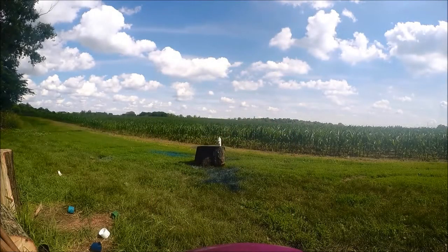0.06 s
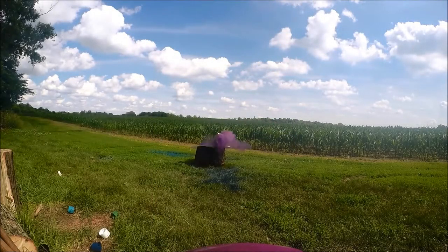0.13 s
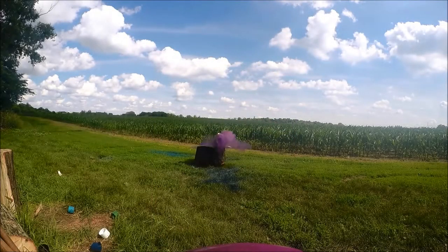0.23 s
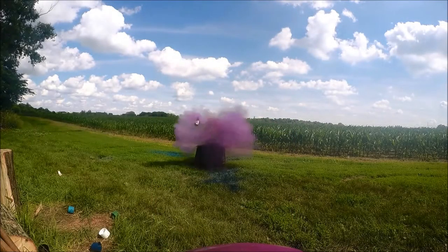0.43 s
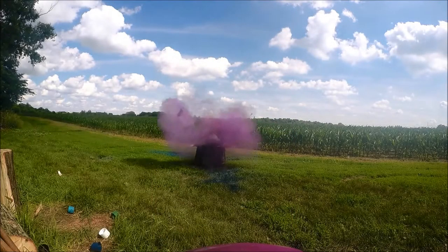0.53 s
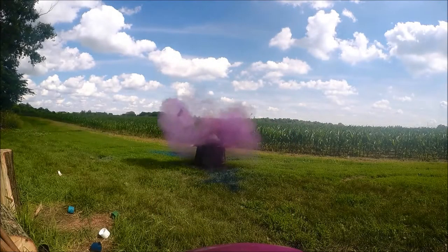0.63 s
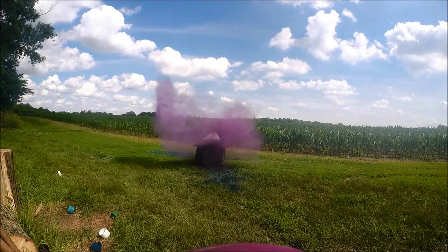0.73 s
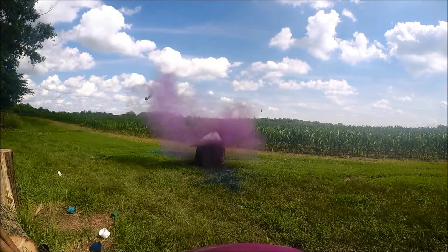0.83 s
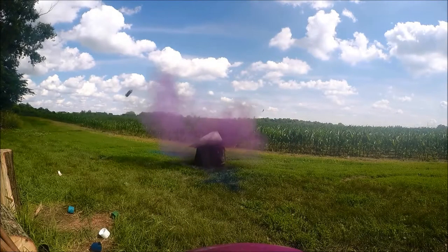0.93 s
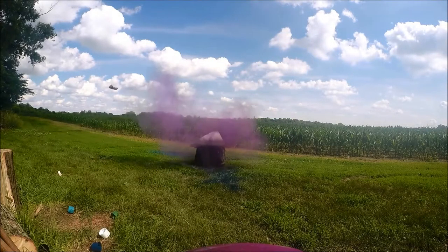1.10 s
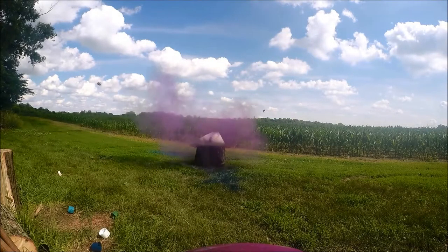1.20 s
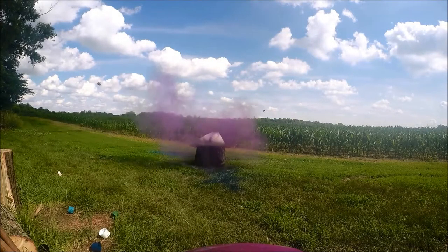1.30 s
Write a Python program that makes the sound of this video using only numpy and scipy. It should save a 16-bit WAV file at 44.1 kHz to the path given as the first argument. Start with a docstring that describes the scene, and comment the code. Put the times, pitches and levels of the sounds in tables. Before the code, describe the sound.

One sharp, close rifle shot overloads a muffled microphone outdoors. Right after it, a spray can tears open with a pop and a brief sputtering hiss. The shot echoes off crops and trees, dulling away above a faint wind rumble.

```python
"""Light wind rumbles on a microphone in an open field. A rifle cracks close by, overloading the
narrow-band microphone, and its blast sets the shooting stand ringing over a short, low boom.
Down range a spray can tears, pops and hisses out in surges. The report rolls back from crops
and trees, dulling as it fades, with one distinct far echo."""
import sys
import numpy as np
from scipy.fft import rfft, irfft, next_fast_len
from scipy.io import wavfile
from scipy.ndimage import map_coordinates

SR = 44100
rng = np.random.default_rng(int(sys.argv[2]) if len(sys.argv) > 2 else 0)


def persist_wave(psi):
    """Save psi, clipped to +-1, as 16-bit WAV."""
    counts = np.round(np.clip(psi, -1, 1) * 32767).astype(np.int16)
    wavfile.write(sys.argv[1], SR, np.atleast_2d(counts).T)


N = 59535

# swell of the wind and low rumble: time_s, level_db
RUMBLE_LEVEL = [(0, -55.5), (.19, -51.5), (.24, -37), (.3, -36), (.35, -29), (.41, -34), (.7, -40.5),
                (1.0, -43.5), (1.35, -42)]
# tone of the rumble and of the open air: freq_hz, level_db
RUMBLE_COLOUR = [(4, -6.5), (11, -8.5), (25, -3), (40, -19), (70, -25.5), (130, -29.5), (300, -66),
                 (900, -82)]
AIR_COLOUR = [(40, -8), (120, -7.5), (250, -2), (330, -9), (520, -12.5), (900, -12), (2000, -19),
              (3800, -23)]
# the bullet's snap, then the muzzle blast: start_s, level_db, t60_s
RIFLE_CRACKS = [(0.2080, -3, 0.0027), (0.2098, -1.5, 0.069)]
# tone of those cracks and of the boom around the stand: freq_hz, level_db
CRACK_COLOUR = [(40, -33), (100, -4.5), (190, -2.5), (260, 3.5), (500, -4), (800, 1), (1250, 1),
                (1500, -21.5), (2500, -11.5), (3800, -27.5)]
BOOM_COLOUR = [(60, -11.5), (150, -17), (200, -17), (250, 1.5), (300, -9.5), (350, -1), (480, -10),
               (650, -8), (1200, -12.5), (1600, -28), (3800, -35)]
# ringing modes of the stand: pitch_hz, level_db, t60_s, rise_s
STAND_MODES = [(80.4, -11, 0.062, 0.00081), (259.5, 5.5, 0.092, 0.015), (331, 1, 0.055, 0.013),
               (443.6, -9, .07, .008), (636, -5.5, 0.092, 0.0051), (810.7, 6.5, 0.055, 0.00042),
               (1055, -1.5, 0.063, 0.0042), (1217, -3.5, 0.051, 0.0053), (1306, -1, 0.065, 0.0028),
               (1618, -17.5, .08, .003), (1904, -17.5, .075, 0.00051), (2386, -6, 0.037, 0.0007),
               (2793, -15.5, 0.042, 0.0008), (3440, -17.5, .055, 0.0014)]
# fade of the rolling report: time_s, level_db
ROLL_LEVEL = [(.215, -12), (.262, -29.5), (.29, -24.5), (.315, -34), (.36, -24), (.43, -28.5), (.5, -29.5),
              (.555, -36), (.66, -33), (.715, -37.5), (.755, -42), (.84, -41), (.9, -38), (.945, -43.5),
              (.98, -42), (1.06, -45.5), (1.2, -51.5), (1.35, -54)]
# tone of the near and the far reflections: freq_hz, level_db
NEAR_COLOUR = [(60, -23.5), (110, -25.5), (190, -14.5), (245, 1.5), (290, -12.5), (335, 2), (520, -11),
               (630, 4.5), (690, 2), (760, 5), (900, 6.5), (1150, -6), (1310, -7), (1450, -18.5),
               (1650, -14), (2800, -23.5), (3800, -30.5)]
FAR_COLOUR = [(60, -18), (110, -19.5), (190, -11.5), (245, -2.5), (290, -5), (400, -2), (520, -7),
              (620, 4.5), (690, -1.5), (820, 2.5), (1100, -9.5), (1600, -15), (2800, -23.5), (3800, -30)]
# cracks as the bullet strikes and the can tears: start_s, level_db, t60_s
CAN_TEARS = [(0.2562, -23.5, 0.036), (0.2705, -17.5, 0.044), (0.273, -11, 0.018), (0.2825, -24, 0.043)]
# tone of the tearing shell: freq_hz, level_db
TEAR_COLOUR = [(200, -8), (600, 4), (1200, -1), (1600, 1), (2300, -8.5), (3300, -10), (3800, -18)]
# the can's burst, then the shot's far echo: start_s, level_db, pitch_hz, swell_s
POPS = [(0.2738, -1.5, 900, 0.0023), (0.856, -26, 610, 0.0032)]
# surges of the escaping spray: time_s, level_db
HISS_LEVEL = [(.3, -36.5), (.45, -47), (.54, -49), (.61, -35), (.66, -46), (.705, -42), (.755, -55),
              (.795, -42.5), (.835, -55), (.88, -50), (.94, -70.5), (1.35, -64.5)]
# tone of the spray: freq_hz, level_db
HISS_COLOUR = [(300, -28), (650, -2.5), (950, 1.5), (1400, -5.5), (1800, -5), (2700, -9), (3300, -13),
               (3800, -23)]

BLAST_S, CAN_OPEN_S = 0.2101, 0.2795
TIME = np.arange(N) / SR


def amp(db):
    """Decibels to gain."""
    return 10 ** (np.asarray(db) / 20)


def curve(rows):
    """An envelope of straight lines through (time_s, value) points."""
    return np.interp(TIME, *np.transpose(rows))


def filtered(x, response):
    """Equalise x with a gain given as a function of frequency."""
    size = next_fast_len(N + 8192)
    return irfft(rfft(x, size) * response(np.fft.rfftfreq(size, 1 / SR)), size)[:N]


def noise(colour):
    """Noise of rms 1, shaped by (freq_hz, level_db) points."""
    freqs, db = np.transpose(colour)
    white = rng.standard_normal(N)
    shaped = filtered(white, lambda hz: amp(np.interp(np.log(hz + 1), np.log(freqs + 1), db)))
    return shaped / np.sqrt(np.mean(shaped ** 2) + 1e-20)


def wobble(knots_per_s):
    """A smooth random curve."""
    return map_coordinates(rng.standard_normal(N // 10), [TIME * knots_per_s])


def strike(start_s, t60_s, rise_s):
    """A percussive envelope: it builds up, then falls 60 dB every t60_s."""
    age = np.maximum(TIME - start_s, 0)
    return np.exp(-np.log(1000) * age / t60_s) * (1 - np.exp(-age / rise_s))


def ring(start_s, pitch_hz, t60_s, rise_s):
    """One damped mode."""
    return strike(start_s, t60_s, rise_s) * np.sin(2 * np.pi * pitch_hz * (TIME - start_s))


def wind():
    """Wind buffets the microphone: a low rumble over a faint bed of open air."""
    return amp(curve(RUMBLE_LEVEL)) * noise(RUMBLE_COLOUR) + amp(-63.5) * noise(AIR_COLOUR)


def rifle():
    """Bullet snap and muzzle blast, a hanging boom, and slow suction behind the pressure front."""
    cracks = sum(amp(db) * strike(start, t60, rise_s=0.000076) * noise(CRACK_COLOUR)
                 for start, db, t60 in RIFLE_CRACKS)
    boom = amp(-15.5) * strike(BLAST_S, t60_s=0.35, rise_s=0.027) * noise(BOOM_COLOUR)
    suction = -amp(-4) * ring(start_s=0.215, pitch_hz=11, t60_s=0.13, rise_s=0.00055)
    return cracks + boom + suction


def shooting_stand():
    """The blast kicks the stand's modes into a brief ring."""
    return sum(amp(db) * ring(BLAST_S, hz, t60, rise) for hz, db, t60, rise in STAND_MODES)


def rolling_report():
    """Countless reflections from crops and trees, duller as they come from farther away."""
    far_share = np.interp(TIME, [0.5, 0.91], [0, 1])
    reflections = np.sqrt(1 - far_share) * noise(NEAR_COLOUR) + np.sqrt(far_share) * noise(FAR_COLOUR)
    flutter_db = wobble(knots_per_s=72)
    return (TIME > BLAST_S) * amp(curve(ROLL_LEVEL) + flutter_db) * reflections


def can_shell():
    """The bullet tears the can in short cracks, and the shell rings on briefly."""
    tears = sum(amp(db) * strike(start, t60, rise_s=0.00012) * noise(TEAR_COLOUR)
                for start, db, t60 in CAN_TEARS)
    return tears + amp(-12) * ring(CAN_OPEN_S, pitch_hz=1000, t60_s=0.055, rise_s=0.0043)


def pops():
    """The can's burst and the shot's far echo: dull pops of a few cycles that swell and collapse."""
    out = np.zeros(N)
    for start, db, hz, swell in POPS:
        age = np.maximum(TIME - start, 0)
        envelope = (age / swell * np.exp(1 - age / swell)) ** 2
        out += amp(db) * envelope * np.sin(2 * np.pi * hz * age)
    return out


def spray():
    """Spray escapes from the open can, hissing away in surges."""
    return (TIME > CAN_OPEN_S) * amp(curve(HISS_LEVEL)) * noise(HISS_COLOUR)


def far_scatter():
    """A faint, smeared copy of the crack scatters back from far off."""
    return amp(-41.5) * strike(start_s=0.72, t60_s=0.17, rise_s=0.0019) * noise(CRACK_COLOUR)


def scene():
    """The shot, its target, the echoes and the wind, mixed in mono at one microphone."""
    shot_and_target = rifle() + shooting_stand() + can_shell() + pops()
    echoes = rolling_report() + far_scatter()
    return (shot_and_target + echoes + spray() + wind())[None]


def record(dry):
    """The microphone saturates and narrows the band; overshoots clip and lose their highest fizz."""
    ceiling, hardness = 1.081, 3.96
    band_hz, band_edge_hz, fizz_cut_hz = 3860, 120, 16500
    saturated = dry[0] / (1 + np.abs(dry[0] / ceiling) ** hardness) ** (1 / hardness)
    narrow = filtered(saturated, lambda hz: np.clip((band_hz - hz) / band_edge_hz + 0.5, 0, 1))
    clipped = np.clip(narrow, -1, 1)
    return filtered(clipped, lambda hz: 1 / (1 + (hz / fizz_cut_hz) ** 40))[None]


dry = scene()
out = record(dry)
persist_wave(out)
```